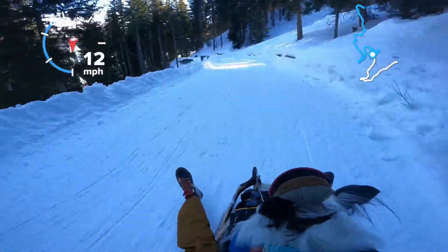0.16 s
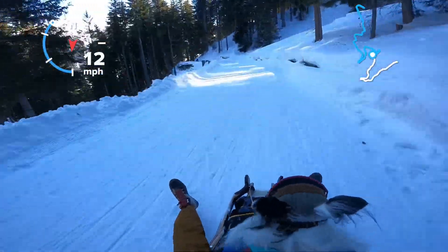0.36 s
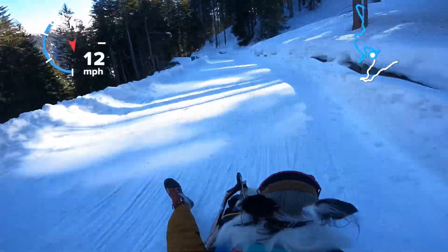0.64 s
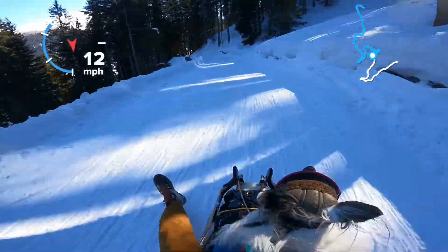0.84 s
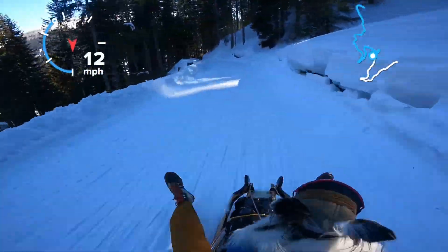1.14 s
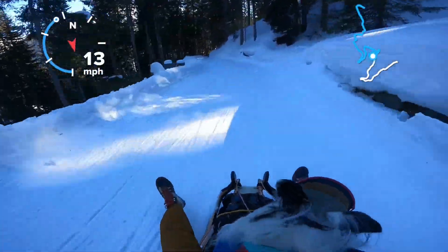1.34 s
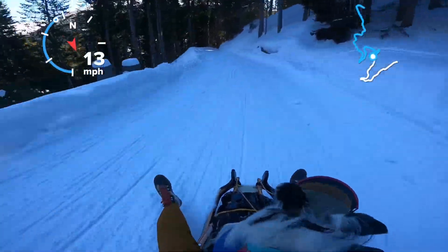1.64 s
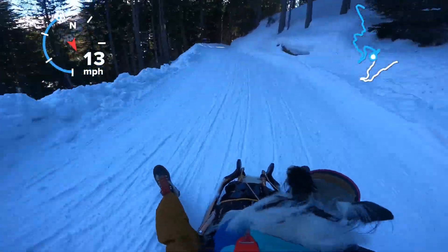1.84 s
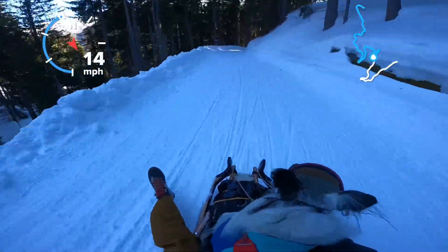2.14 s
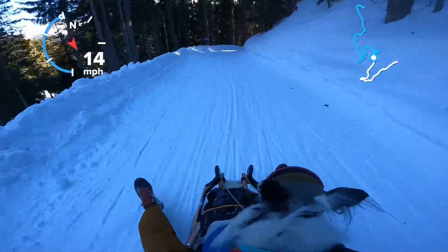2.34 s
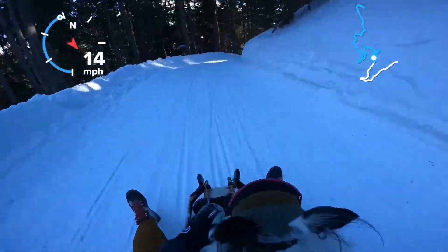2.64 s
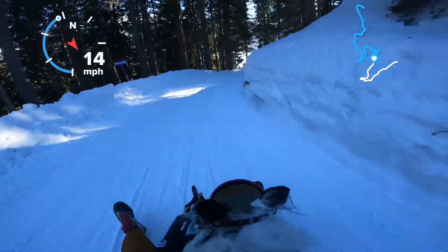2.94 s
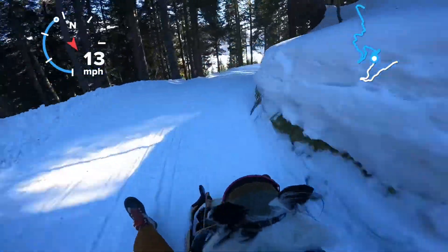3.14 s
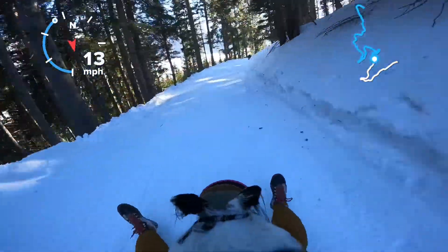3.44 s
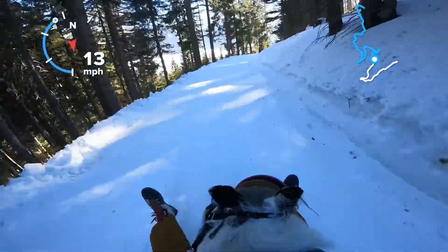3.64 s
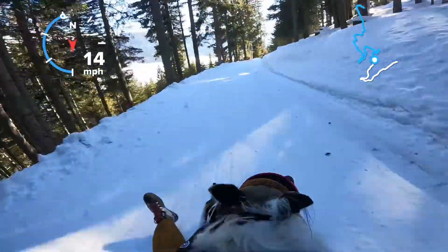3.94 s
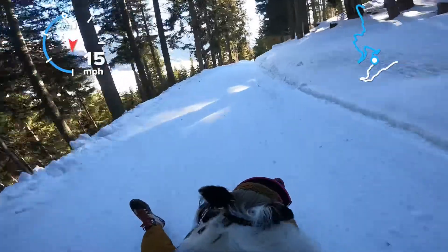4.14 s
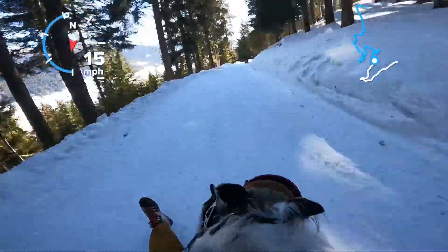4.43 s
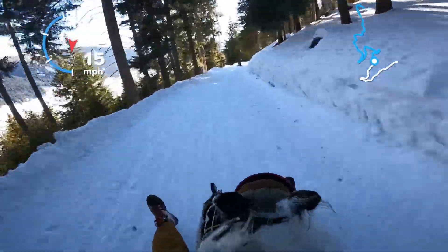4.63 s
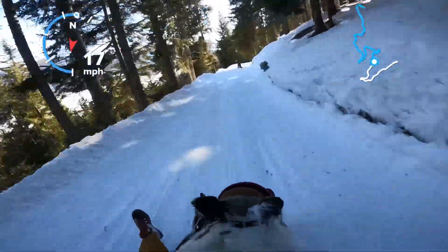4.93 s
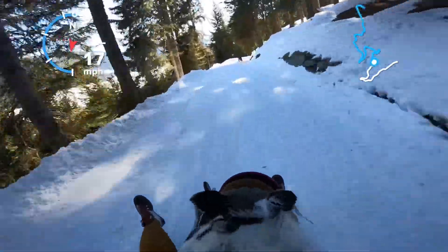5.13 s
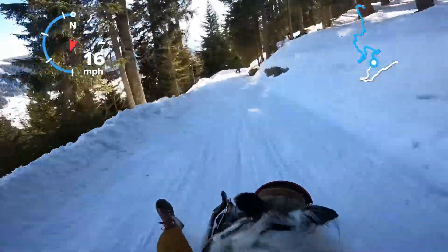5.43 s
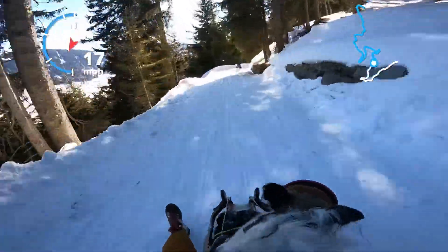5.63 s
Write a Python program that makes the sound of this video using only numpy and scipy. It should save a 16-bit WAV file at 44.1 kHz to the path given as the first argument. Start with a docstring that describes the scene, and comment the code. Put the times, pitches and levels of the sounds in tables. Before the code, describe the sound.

Close to the rider on an open snowy forest track, two wooden sled runners crush packed snow. At first the crunch and scrape are moderate, over a deep uneven rumble and low frame chatter, with very faint edge squeals until about 1.1 s. Dull, short wooden knocks cluster from 0.15 to 0.5 s, with soft thumps at 0.5-0.7 s and a small ice crack. The rumble eases near 0.9 s while the scraping builds, becoming full and bright with spray by 2 s. Knocks and thumps crowd 1.8-2.8 s; the runners lighten briefly near 2.6 s, then bite again. The strongest knock hits at 3.27 s as the scrape dips. A short rough bite follows at 3.6 s, then steadier grinding with sparse knocks. Around 5.4 s the spray peaks with an ice crack, a thump and rapid knocking to 5.75 s. Faint high hiss stays throughout; no echo.

```python
"""The two runners of a wooden sled crush packed snow, heard close to the rider on a forest track.
Breaking grains make the crunch, scrape and fine spray, coloured noise that grows with effort;
runner edges squeal faintly and ice chips crack. Ruts make the frame ring briefly and dully,
dips thump, and the uneven track adds a low rumble and chatter. A faint steady hiss lies behind.
Open air, no echo."""
import sys
import numpy as np
from scipy import signal
from scipy.fft import rfft, irfft
from scipy.io import wavfile
from scipy.ndimage import uniform_filter1d, minimum_filter1d

SR = 44100
rng = np.random.default_rng(int(sys.argv[2]) if len(sys.argv) > 2 else 0)


def materialize(psi):
    """Save the field psi as 16-bit PCM at rate SR to the path in sys.argv[1].

    A 1-D psi becomes a single channel; in a 2-D psi each row is a channel.
    """
    bounded = np.clip(np.atleast_2d(psi).T, -1, 1)
    quanta = np.round(bounded * 32767).astype(np.int16)
    wavfile.write(sys.argv[1], SR, quanta)


N = 254879
TIME = np.arange(N) / SR  # seconds

# how hard the runners work the snow as the sled gathers speed: time_s, effort_db
EFFORT = [(0, -9), (1.2, -2), (2.05, 1.5), (3.0, 0), (4.3, -.5), (5.4, 2), (5.78, -0.5)]
# a runner digging in (+) or going light over a hump (-): middle_s, length_s, effort_change_db
BITES = [(2.09, .2, 0.7), (2.575, 0.079, -4), (2.66, .1, 3.2), (3.39, 0.15, -6.5), (3.635, 0.063, 4),
         (4.75, 0.12, -3), (5.0, 0.29, 1)]
# the rider's weight, +1 on the first runner and -1 on the second: time_s, lean (no unit)
LEAN = [(.3, -0.52), (1.2, 1), (2.2, 0.78), (2.75, 1), (3.25, -0.33), (5.78, -0.83)]
# ringing tones of the first runner: pitch_hz, width_hz, relative_level_db
FIRST_RUNNER = [(2069, 47, 8), (2295, 390, 4)]
# ringing tones of the second runner: pitch_hz, width_hz, relative_level_db
SECOND_RUNNER = [(2813, 120, 3), (3470, 85, -1)]
# tone colour of snow packing under the runners: pitch_hz, relative_level_db
CRUNCH_COLOUR = [(250, -32), (450, 6.5), (680, 3.5), (950, -2), (1170, 3.5), (1400, -6.5), (1800, -11.5),
                 (2600, -12.5), (5000, -52)]
# tone colour of snow scraping along the runners: pitch_hz, relative_level_db
SCRAPE_COLOUR = [(700, -31), (1500, -6.5), (2450, -10), (3150, -3.5), (3900, -4.5), (4500, -3), (5150, 1.5),
                 (5600, -5), (6200, -14), (7500, -10), (11000, -44)]
# tone colour of the flying spray: pitch_hz, relative_level_db
SPRAY_COLOUR = [(4500, -45), (6400, -6), (7400, -3), (8500, 3), (8750, 0), (9020, 3.5), (9700, -9),
                (10400, -4.5), (11200, 4), (11550, -2.5), (11900, 5.5), (12800, -2.5), (14200, 5),
                (15200, -10.5)]
# runner edges singing on hard patches: start_s, end_s, pitch_hz, width_hz, flutter_hz,
# level_db (before fading in and out)
SQUEALS = [(0.038, 0.514, 2040, 238.4, 15, -59), (0.462, 1.118, 5550, 602, 240, -54.5)]
# ice chips cracking under a runner: start_s, level_db (before colouring)
CHIPS = [(0.647, -35), (3.337, -39), (5.389, -21)]
# ruts striking the frame: start_s, ring_peak_db, hardness_db (sets the tick's level and brightness)
KNOCKS = [(0.146, -12.5, -26), (0.171, -10, -35), (0.196, -14, -49), (0.229, -14.5, -25.5),
          (0.362, -12.5, -24), (0.399, -9.5, -16), (0.453, -12.5, -30.5), (0.505, -12.5, -19.5),
          (0.703, -18, -28), (0.725, -18.5, -50), (1.272, -11.5, -23.5), (1.772, -18, -41),
          (1.825, -18, -35), (1.851, -14.0, -36.0), (1.943, -11.5, -26.5), (1.982, -14, -35),
          (2.069, -14.5, -44), (2.09, -16, -43), (2.171, -12.5, -42), (2.221, -11, -37),
          (2.254, -19.5, -50), (2.306, -13.0, -25.5), (2.344, -14.5, -35), (2.392, -16, -47),
          (2.484, -11, -34.0), (2.538, -15, -25.5), (2.635, -15, -35), (2.721, -11.5, -20.5),
          (2.77, -12.5, -23), (2.811, -14, -25.5), (3.27, -2.5, -18.5), (3.336, -10, -28),
          (3.346, -12.5, -23), (3.836, -16.0, -29.5), (3.937, -20, -54), (4.108, -16, -22.5),
          (4.133, -15.5, -57), (4.957, -15, -29), (5.388, -21, -26.5), (5.425, -9, -30),
          (5.513, -14.5, -43), (5.522, -9.5, -38), (5.545, -10.5, -34), (5.552, -11, -24),
          (5.581, -12.5, -56), (5.735, -10, -29), (5.743, -10, -31)]
# what the frame rings with: pitch_hz, time_to_fall_60_db_s, relative_level_db
FRAME_MODES = [(46.6, 0.087, -6), (268, 0.0088, -21), (286.4, 0.037, 16), (340, 0.02, -1)]
# short tones of a hard contact: pitch_hz, time_to_fall_60_db_s, relative_level_db
CONTACT_MODES = [(500, 0.0067, 10), (735, 0.01, -5), (1000, 0.0038, 7), (1486, 0.011, -8.5)]
# the sled dropping into dips of the track: start_s, peak_db
DROPS = [(0.525, -14), (0.573, -14), (0.713, -16), (0.731, -16), (2.179, -13.5), (2.21, -17), (2.259, -19),
         (2.508, -15.5), (2.548, -14.5), (4.113, -17), (4.166, -18.5), (5.362, -15), (5.399, -11)]
# what the loaded sled thumps with: pitch_hz, time_to_fall_60_db_s, relative_level_db
THUMP_MODES = [(64, 0.055, -4), (104.5, 0.041, -9.5)]
# smooth (-) or washboard (+) track: middle_s, length_s, rumble_change_db
STRETCHES = [(.3, 1, 1), (.87, 0.21, -12), (1.65, 0.43, -5), (2.05, 0.5, 1.5), (3.3, 0.98, -2),
             (3.77, 0.048, 9), (4.65, 0.46, 0.5)]
# tone colour of the whole sled heaving: pitch_hz, relative_level_db
RUMBLE_COLOUR = [(10, -61), (20, -20), (29, 6.5), (45, -0.5), (68, -4), (90, -8), (120, -12), (165, -16.5),
                 (260, -38), (500, -58.5)]
# tone colour of the chattering frame: pitch_hz, relative_level_db
CHATTER_COLOUR = [(100, -40), (170, -3.5), (230, 0.5), (285, 5), (330, -1.5), (400, -5.5), (550, -24),
                  (900, -18), (1800, -46)]
# tone colour of the hiss at the very top: pitch_hz, relative_level_db
HISS_COLOUR = [(9500, -22), (12000, -3), (14300, 1)]
# how wide the snow sounds at the two microphone ports: pitch_hz, side_minus_mid_db
WIDTH = [(50, -72), (250, -57), (500, -39), (1000, -15.5), (2000, -2.5), (5000, -9), (8000, -5.5),
         (10000, -4), (12000, -9), (14500, -46)]
# left-right balance of the snow at the two ports: pitch_hz, left_minus_right_db
TILT = [(200, -7.5), (700, 2), (2000, -1), (4000, 2), (8000, 2.5), (12000, 1)]

# base levels at 0 dB effort, and rise in dB for each dB of effort
CRUNCH_DB, CRUNCH_LAW = -43.5, 0.93
SCRAPE_DB, SCRAPE_LAW = -45.5, 0.85
SPRAY_DB, SPRAY_LAW = -48.5, 2.13
CHATTER_DB, CHATTER_LAW = -36, 0.85
CRUNCH_BITE_SHARE = 0.47  # the crunch follows only this share of a bite
LEAN_DB = 4.5  # how much louder a runner rings under the full weight
SPRAY_LEAN_DB = -1.3  # the second runner throws its spray nearer the microphone
FIRM_DB, BRIGHTEN = -20, 0.22  # a firm contact; extra dB per octave for each dB harder
SPOT_DB, DETUNE = 2, 0.025  # random spread of contact levels (dB) and frame pitches (a share)
KNOCK_PAN_DB = 0.33  # knocks are a shade louder on the left
RUMBLE_DB, HISS_DB = -28, -58  # rumble on an ordinary stretch; steady hiss
CEILING_DB, HOLD_S, TOP_HZ = -7.7, 0.008, 15100  # limiter ceiling and window; treble cut


def runners(grip, first_db=-8, second_db=-7, grip_db=0.98, spray_grip_db=2.4):
    """Snow packs with a crunch, scrapes along the ringing runners and flies off as spray."""
    effort, bite, lean = curves(EFFORT)[0], swells(BITES), curves(LEAN)[0]

    crunch = colour(grains(per_s=7000, spread_db=1.0), CRUNCH_COLOUR)
    crunch *= undb(CRUNCH_DB + CRUNCH_LAW * (effort + CRUNCH_BITE_SHARE * bite))

    scrape = colour(grains(per_s=18000, spread_db=1.5), SCRAPE_COLOUR)
    first_ring = resonate(grains(per_s=8000, spread_db=3.0), FIRST_RUNNER)
    second_ring = resonate(grains(per_s=8000, spread_db=3.5), SECOND_RUNNER)
    scrape += undb(first_db + LEAN_DB * lean) * first_ring
    scrape += undb(second_db - LEAN_DB * lean) * second_ring
    scrape *= undb(SCRAPE_DB + SCRAPE_LAW * (effort + bite))

    spray = colour(grains(per_s=33000, spread_db=2.5), SPRAY_COLOUR)
    spray_db = SPRAY_DB + SPRAY_LAW * (effort + bite) + SPRAY_LEAN_DB * lean + spray_grip_db * grip
    return (crunch + scrape) * undb(grip_db * grip) + spray * undb(spray_db)


def runner_grip():
    """The runners' grip on the snow swells and stutters, at three speeds at once; rms 1."""
    return unit(walk(rate=27) + 1.16 * walk(rate=97) + 0.29 * walk(rate=12))


def squeals(stutter_db=2.0, fade_s=0.045):
    """Stick and slip make a faint, uneven note whose pitch flutters."""
    out = np.zeros(N)
    for start, end, hz, width_hz, flutter_hz, db in SQUEALS:
        gate = np.clip(np.minimum(TIME - start, end - TIME) / fade_s, 0, 1)
        pitch_hz = hz + flutter_hz * walk(rate=84)
        phase = 2 * np.pi * np.cumsum(pitch_hz) / SR
        # random levels on both waves blur the note into a narrow band
        note = walk(rate=width_hz) * np.cos(phase) + walk(rate=width_hz) * np.sin(phase)
        stutter = undb(stutter_db * walk(rate=35.7))
        out += undb(db) * gate * unit(note * stutter)
    return out


def chips(decay_s=0.0012):
    """Ice cracks as brief bright bursts of noise that die away at once."""
    out, t = np.zeros(N), TIME[:SR // 40]
    for s, db in CHIPS:
        crack = np.exp(-t / decay_s) * rng.standard_normal(len(t))
        add(out, s, undb(db) * crack)
    bright = across_hz([(800, -16), (3000, -6), (5000, 14), (6500, -11), (14000, -6)])
    return irfft(rfft(out) * bright, N)


def knocks(tick_db=8.5, soft_rise_s=0.0033, hard_rise_s=0.00042, tick_delay_s=0.00037, tick_top_hz=2200):
    """Each rut shoves the frame into ringing, with a tick as wood meets wood: louder when harder."""
    thuds, ticks = np.zeros(N), np.zeros(N)
    for s, ring_peak_db, hard_db in KNOCKS:
        # never struck at quite the same spot
        detune = 1 + DETUNE * rng.standard_normal(len(FRAME_MODES))
        spot = rng.standard_normal(len(CONTACT_MODES))
        thud = ring(FRAME_MODES, detune, soft_rise_s)
        tick = ring(struck(hard_db, spot), detune, hard_rise_s)
        add(thuds, s, undb(ring_peak_db) * thud)
        add(ticks, s + tick_delay_s, undb(hard_db + tick_db) * tick)
    # little treble gets from the frame to the microphone
    lowpass = signal.butter(4, tick_top_hz, fs=SR, output="sos")
    return thuds + signal.sosfilt(lowpass, ticks)


def struck(hard_db, spot):
    """A harder contact is brighter, and the spot struck favours some tones over others."""
    lowest_hz = CONTACT_MODES[0][0]
    tilt_db = BRIGHTEN * (hard_db - FIRM_DB)  # per octave
    return [(hz, t60, db + tilt_db * np.log2(hz / lowest_hz) + SPOT_DB * chance)
            for (hz, t60, db), chance in zip(CONTACT_MODES, spot)]


def drops(rise_s=0.0059):
    """The rider's weight lands softly after a dip: a low thump with no tick."""
    out = np.zeros(N)
    for s, db in DROPS:
        add(out, s, undb(db) * ring(THUMP_MODES, np.ones(len(THUMP_MODES)), rise_s))
    return out


def shaking(bump_db=1.5, lump_db=1.57):
    """The uneven track heaves the whole sled, and small bumps keep its frame chattering."""
    heave = colour(rng.standard_normal(N), RUMBLE_COLOUR)
    # even out the noise's own swings, so the track and bumps set the level
    heave = unit(heave / np.sqrt(uniform_filter1d(heave ** 2, SR // 8)))
    bumps = walk(rate=19)
    rumble = heave * undb(RUMBLE_DB + swells(STRETCHES) + lump_db * bumps)
    chatter = colour(grains(per_s=1500, spread_db=0.5) * undb(bump_db * bumps), CHATTER_COLOUR)
    return rumble + chatter * undb(CHATTER_DB + CHATTER_LAW * curves(EFFORT)[0])


def hiss():
    """A faint steady hiss: random noise coloured to leave only the very top."""
    return undb(HISS_DB) * colour(rng.standard_normal(N), HISS_COLOUR)


def undb(db):
    """Decibels to gain."""
    return 10 ** (np.asarray(db) / 20)


def unit(x):
    """Scale to rms (average strength) 1."""
    return x / np.sqrt(np.mean(x ** 2))


def curves(table):
    """Each column of a timed table, joined by straight lines."""
    s, *columns = np.transpose(table)
    return [np.interp(TIME, s, c) for c in columns]


def swells(table):
    """A smooth rise and fall in dB for each (middle, length, dB) row."""
    return sum(db * np.cos(np.pi * np.clip((TIME - s) / length, -.5, .5)) for s, length, db in table)


def across_hz(points):
    """Gain at every frequency, from (Hz, dB) points."""
    hz, db = np.transpose(points)
    f = np.fft.rfftfreq(N, 1 / SR) + 1  # 1 Hz added to avoid log of zero
    return undb(np.interp(np.log(f), np.log(hz), db))


def colour(x, points):
    """Strengthen and weaken frequencies to give a sound its tone colour; rms 1."""
    return unit(irfft(rfft(x) * across_hz(points), N))


def resonate(x, peaks):
    """Let a sound ring through (Hz, width Hz, dB) resonances; rms 1."""
    f = np.fft.rfftfreq(N, 1 / SR) + 1
    response = sum(undb(db) / (1 + 1j * (f - hz ** 2 / f) / width) for hz, width, db in peaks)
    return unit(irfft(rfft(x) * response, N))


def walk(rate):
    """Random levels, each held for 1 / rate seconds, then smoothed twice; rms 1."""
    k = max(int(SR / rate), 1)
    held = np.repeat(rng.standard_normal(N // k + 1), k)[:N]
    return unit(uniform_filter1d(uniform_filter1d(held, k), k))


def grains(per_s, spread_db):
    """Snow grains break at random moments: many small, a few large; rms 1."""
    breaks = rng.random(N) < per_s / SR
    pulses = breaks * rng.standard_normal(N)
    size = np.minimum(rng.exponential(size=N), 4)
    return unit(pulses * undb(spread_db * size))


def ring(modes, detune, rise_s):
    """Damped tones swell while the contact lasts, then die away; peak 1."""
    t = TIME[:SR // 5]
    free = np.zeros(len(t))
    for (hz, t60, db), d in zip(modes, detune):
        decay = np.exp(-np.log(1000) * t / t60)
        free += undb(db) * np.sin(2 * np.pi * hz * d * t) * decay
    y = free * (1 - np.exp(-t / rise_s))
    return y / np.abs(y).max()


def add(out, s, x):
    """Mix a short sound in at time s (seconds)."""
    i = max(int(s * SR), 0)
    out[i:i + len(x)] += x[:N - i]


def scene():
    """Frame sounds reach both ports nearly alike; snow noise comes from all around the sled."""
    grip = runner_grip()
    mid = runners(grip) + squeals() + chips()
    # fresh grains, added on the left and subtracted on the right, widen the snow
    side = irfft(rfft(runners(grip)) * across_hz(WIDTH), N)
    tilt = np.sqrt(across_hz(TILT))  # half the difference for each port
    left = irfft(rfft(mid + side) * tilt, N)
    right = irfft(rfft(mid - side) / tilt, N)
    snow = np.array([left, right])
    frame = knocks() * undb(np.array([[KNOCK_PAN_DB], [-KNOCK_PAN_DB]]) / 2)
    return snow + frame + drops() + shaking() + hiss()


def record(dry):
    """A limiter turns both sides down together at the loudest peaks; then the top is cut."""
    loudest = np.abs(dry).max(axis=0) + 1e-9
    allowed = np.minimum(1, undb(CEILING_DB) / loudest)
    span = int(HOLD_S * SR)
    gain = uniform_filter1d(minimum_filter1d(allowed, span), span)
    lowpass = signal.ellip(8, .2, 70, TOP_HZ, fs=SR, output="sos")
    return signal.sosfilt(lowpass, dry * gain)


dry = scene()
out = record(dry)
materialize(out)
```